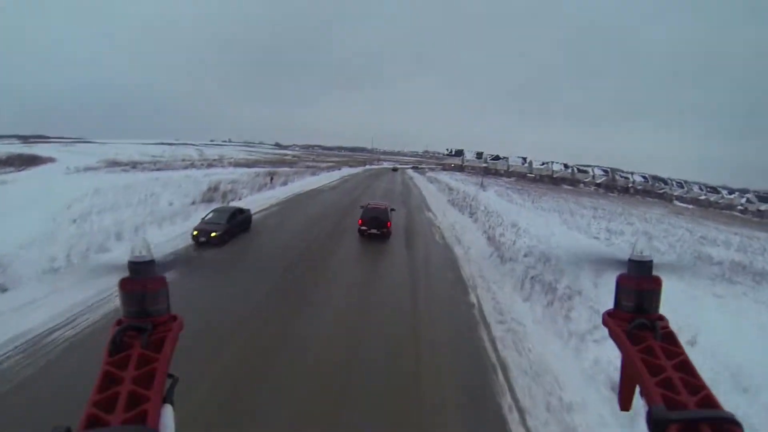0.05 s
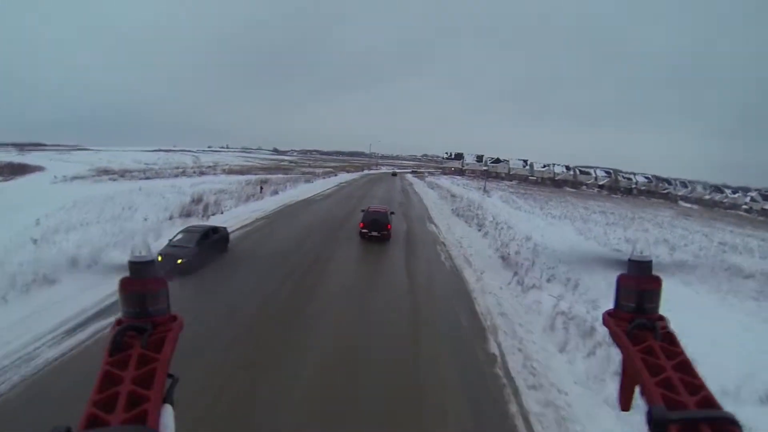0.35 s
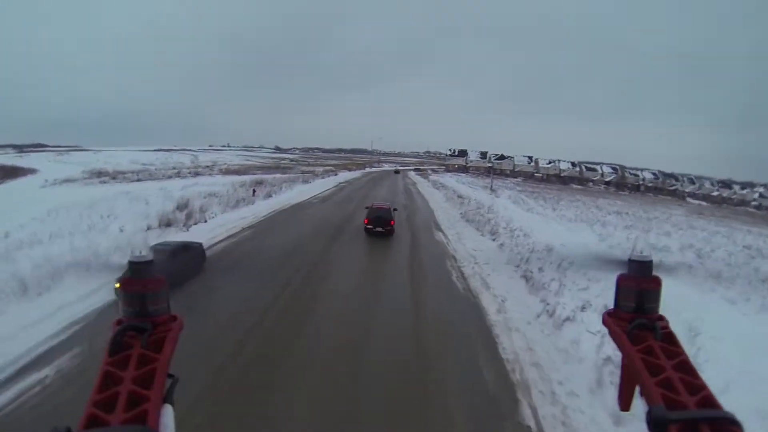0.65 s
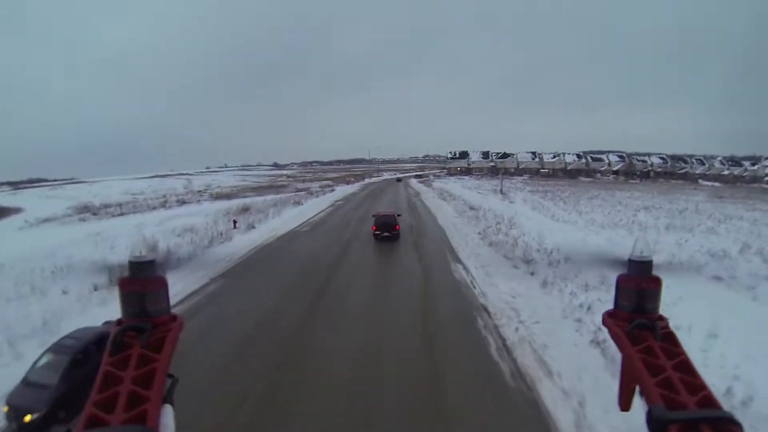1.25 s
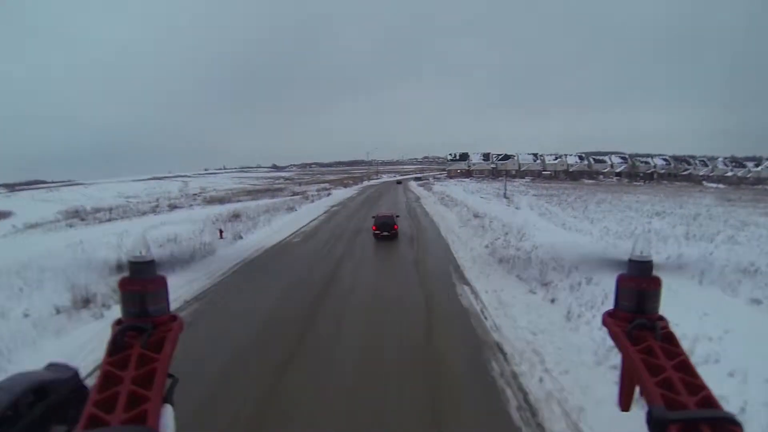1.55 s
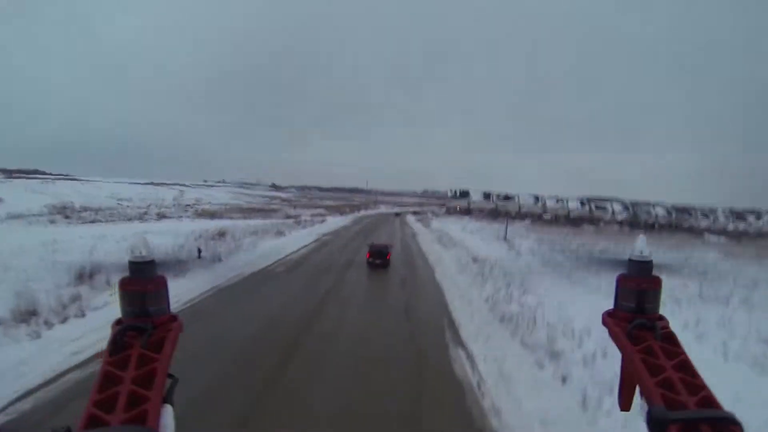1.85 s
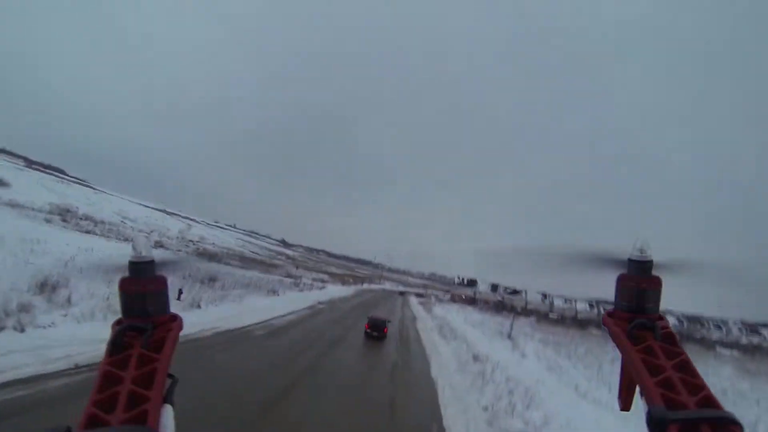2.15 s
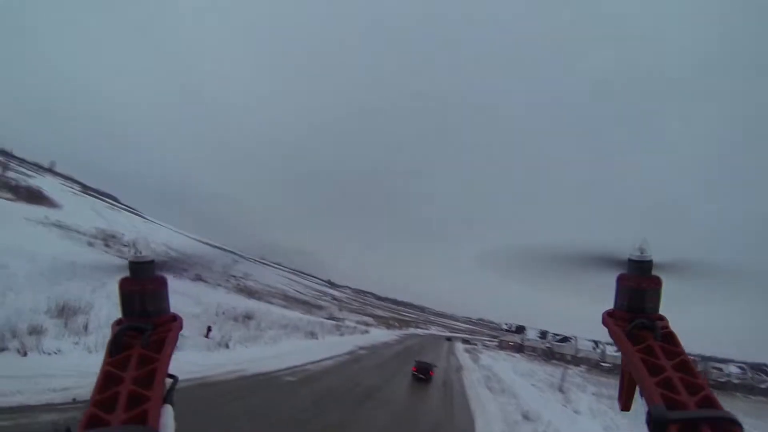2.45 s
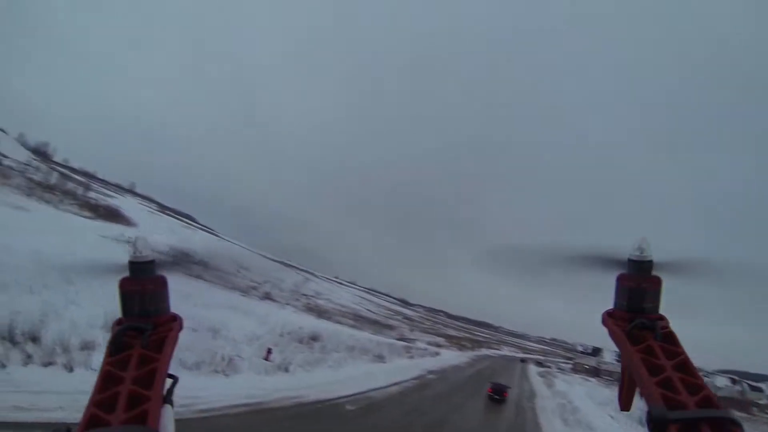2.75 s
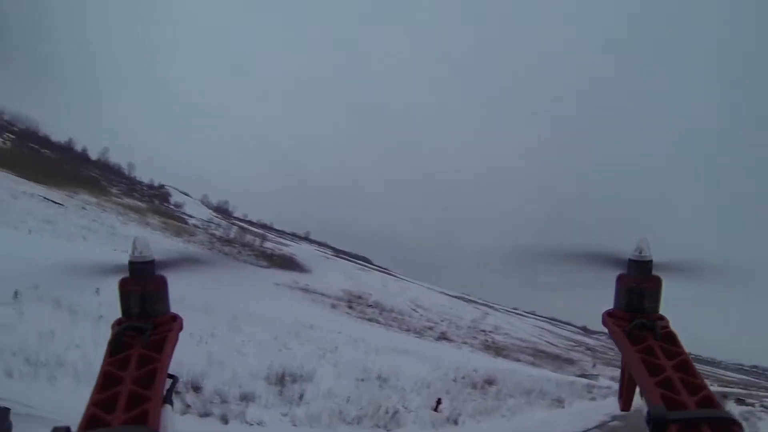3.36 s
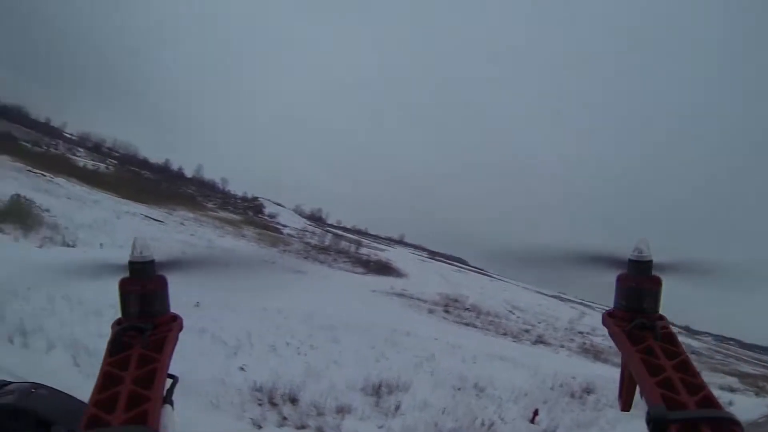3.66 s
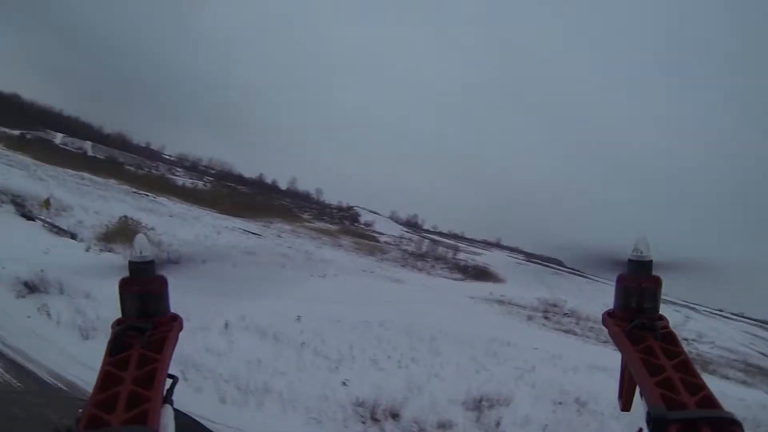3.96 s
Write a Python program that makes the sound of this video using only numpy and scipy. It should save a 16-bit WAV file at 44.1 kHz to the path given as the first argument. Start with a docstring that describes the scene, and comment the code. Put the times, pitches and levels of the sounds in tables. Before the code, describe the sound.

A drone's propellers buzz throughout, heard from its own frame in the open air. From the start, the rotors beat against each other with a choppy rasp, over hiss, a thin high whistle and light wind rumble. Around 2 seconds their pitches spread apart as it banks. From about 2.6 seconds the motor whine and buzz grow louder, and near 3.5 to 4 seconds the rasp and wind ease.

```python
"""A multirotor drone flies along a snowy road, heard from a camera on its own frame. From the start,
propellers at slightly different speeds beat against each other and chop gusty air into a rasp, the
speed controllers whistle near 8 kHz, and wind rumbles. About two seconds in, the rotor speeds spread
apart and the craft banks away; the whine and buzz of the motors then grow louder.
Late in the turn the air gets smoother."""
import sys
import numpy as np
from scipy import signal
from scipy.fft import rfft, irfft
from scipy.io import wavfile

SR = 44100
rng = np.random.default_rng(int(sys.argv[2]) if len(sys.argv) > 2 else 0)


def inscribe(sig):
    """Save sig as 16-bit PCM at rate SR to the path in sys.argv[1].

    A 1-D sig is mono; a 2-D sig holds one channel per row.
    Samples are clipped to [-1, 1] before scaling.
    """
    pcm = np.round(np.clip(np.atleast_2d(sig).T, -1, 1) * 32767)
    wavfile.write(sys.argv[1], SR, pcm.astype(np.int16))


N = 176400
T = np.arange(N) / SR
GUST_HZ = 25  # bandwidth of the random flutter
COG_ORDER, BUZZ_ORDER = 14, 42  # cycles per shaft turn

# Spectra of wind, hiss, turbulent wake and chopped air: frequency_hz, density_db
WIND_SPECTRUM = [(10,9.5),(35,2.5),(60,0.5),(85,-0.5),(120,-7),(150,-34.5),(300,-12),(800,-50)]
HISS_SPECTRUM = [(900,-41),(1500,2.5),(2500,0),(3400,-2),(4300,-1.5),(4700,-7),(5100,-16.5),(5800,-24),(6400,-19),(7300,-26),(7700,-15),(7870,-4.5),(8230,0.5),(8500,-8),(8900,-17),(9500,-17),(9900,-20.5),(11000,-24),(12000,-42)]
WAKE_SPECTRUM = [(100,-4),(200,0.5),(290,-10.5),(380,-7),(440,-5),(520,3),(620,-13),(690,-7),(800,3.5),(1000,3),(1300,-2.5),(2000,-24.5)]
RASP_SPECTRUM = [(500,-52),(900,-12.5),(1200,-3.5),(1450,3),(1680,4),(2050,-1),(2500,1.5),(2950,-7.5),(3400,0),(4300,-22.5),(5100,-24.5),(7000,-31.5),(12000,-37)]
# Envelopes of the same four noises: time_s, level_db
WIND_LEVEL = [(0,-34),(.14,-35),(.2,-25),(.28,-41),(1.4,-39),(1.8,-30),(2.05,-36),(2.3,-33),(2.6,-31),(2.82,-31),(3.1,-37),(3.4,-44),(4,-42)]
HISS_LEVEL = [(0,-23),(1.4,-25.5),(2.6,-22),(4,-24)]
WAKE_LEVEL = [(0,-29.5),(1.2,-30),(2.4,-30),(3,-37),(3.4,-37),(3.8,-44),(4,-42)]
RASP_LEVEL = [(0,-21),(.7,-20.5),(1.2,-22),(1.26,-28),(1.32,-19),(1.75,-19),(2.05,-25),(2.45,-20.5),(2.8,-21.5),(2.9,-27),(3.02,-20.5),(3.4,-23),(3.78,-26.5),(4,-27)]
# Switching tone of each speed controller: pitch_hz
SWITCH_HZ = [8011.76, 8031.11, 8042.05, 8065.04, 8094.52]
# Strength of each switching tone: level_db
SWITCH_DB = [-29, -37, -25, -43.5, -45]
# Envelopes of the switching tones, motor buzz, cogging whine and frame vibration: time_s, level_db
SWITCH_LEVEL = [(0,0),(1.5,0),(2.8,0.5),(3.4,1),(4,5)]
BUZZ_LEVEL = [(0,-43),(1.3,-45),(2.1,-40),(2.7,-34),(3.3,-31.5),(3.7,-34),(4,-38)]
WHINE_LEVEL = [(0,-43),(.6,-39),(1.5,-40),(2.1,-48),(2.45,-42),(2.68,-28),(3,-31),(3.3,-26),(3.55,-27.5),(3.82,-22.5),(4,-27)]
FRAME_LEVEL = [(0,-32),(.85,-29),(2.3,-33),(3,-25),(3.4,-23.5),(3.8,-20.5),(4,-22.5)]
# Resonances of the motor housings, frame, arms and blade slaps: frequency_hz, gain_db
HOUSING_RESPONSE = [(3600,-1),(3850,0),(4250,0),(4400,-9),(4700,4)]
FRAME_RESPONSE = [(700,-27),(950,-7.5),(1150,-26),(1400,0),(1610,7.5),(1720,0),(1900,-11.5),(2150,-5),(2400,0.5),(2740,-1),(2900,-15),(3500,-12),(4250,-8.5),(5000,-30)]
ARM_RESPONSE = [(300,-8),(345,-0.5),(385,-2),(430,1.5),(460,2),(495,6.5),(525,0.5),(565,-2),(650,-3),(1200,-0.5)]
SLAP_RESPONSE = [(400,-65),(1000,-22.5),(1350,-11),(1600,-0.5),(1800,2.5),(2100,-4),(2500,-7),(3000,-25),(4200,-20),(5200,-46),(9000,-60)]
# Envelopes of the blade slaps, blade-pass hum and its overtones: time_s, level_db
SLAP_LEVEL = [(0,-21.5),(.8,-23.5),(1.4,-22.5),(1.75,-21.5),(2.7,-23),(3.3,-27),(3.7,-27),(4,-48)]
HUM_LEVEL = [(0,-4),(.4,0.5),(1.5,-0.5),(2.6,1),(3.2,-1.5),(3.8,-0.5),(4,-8)]
OVERTONE_LEVEL = [(0,4.5),(.8,3),(1.3,-0.5),(1.8,2.5),(2.4,3.5),(3.05,5),(3.5,1),(4,-4)]
# Propeller overtones: blade_rate_multiple, level_db
OVERTONES = [(2, -44.5), (2.5, -58), (3, -45), (4, -52), (5, -48.5), (6, -53)]
# Speed of the nearest rotor: time_s, blade_pass_hz
NEAR_BLADE_RATE = [(0,182.9),(.2,180.6),(.48,181.3),(.62,187.7),(.74,184.2),(.86,186.8),(1.08,178.3),(1.22,177.3),(1.48,179.5),(1.66,173.1),(1.88,178.5),(2.1,173.1),(2.38,171.2),(2.5,180.4),(2.7,188.5),(3.27,183.1),(3.84,189.4),(4,187.1)]
# Speeds of the other rotors, one list each: time_s, blade_pass_hz
OTHER_BLADE_RATES = [
    [(0,203),(.3,200),(.65,204),(1.3,190),(1.78,186),(2.07,210),(2.37,218.5),(2.6,210),(2.9,208),(3.5,200),(4,194)],
    [(0,193),(.45,194),(1.2,185),(1.7,179),(2.3,199),(2.75,204),(3.03,201.5),(3.2,196),(4,192)],
    [(0,187),(.5,179),(.8,175),(1.6,166),(1.87,173),(2.1,185),(2.45,186),(2.75,193),(3.05,186),(3.3,182.5),(3.6,186.5),(4,189)],
    [(0,170),(.45,170),(.65,163),(.9,164),(1.15,158),(1.65,155),(1.9,174),(2.2,193),(2.5,197),(2.9,193),(3.3,186),(4,190)],
]
# Balance of the rotors, nearest first: blade_db, overtones_db, buzz_db
ROTOR_LEVELS = [(-29, -5, -3), (-38, -3, 0.5), (-37, -3.5, -2), (-35.5, -1.5, -4.5), (-50.5, -1.5, -7)]


def amp(db):
    """Amplitude ratio: tenfold for every 20 dB."""
    return 10 ** (np.asarray(db) / 20)


def unit(x):
    """Normalisation to rms 1."""
    return x / np.sqrt(np.mean(x ** 2) + 1e-20)


def curve(points):
    """Linear interpolation of (time_s, value) rows."""
    return np.interp(T, *np.transpose(points))


def response(points, hz):
    """Frequency response: gain interpolated in decibels over log frequency."""
    frequency_hz, gain_db = np.transpose(points)
    return amp(np.interp(np.log(hz + 1), np.log(frequency_hz), gain_db))


def shaped(x, points):
    """Filtering multiplies the spectrum by a response; the result has rms 1."""
    return unit(irfft(rfft(x) * response(points, np.fft.rfftfreq(N, 1 / SR)), N))


def drift(cutoff_hz):
    """Low-pass noise: smooth random motion of rms 1."""
    coarse_s = T[::32]
    hz = np.fft.rfftfreq(len(coarse_s), 32 / SR)
    spectrum = rfft(rng.standard_normal(len(coarse_s))) / (1 + (hz / cutoff_hz) ** 2) ** 2
    return np.interp(T, coarse_s, unit(irfft(spectrum, len(coarse_s))))


def flutter(depth_db):
    """Random amplitude modulation: a gain that wavers by depth_db rms."""
    return amp(depth_db * drift(GUST_HZ))


def tone(phase):
    """Simple harmonic motion of rms 1 with a random starting phase."""
    return np.sqrt(2) * np.sin(phase + rng.uniform(0, 2 * np.pi))


def shaft_angle(blade_rate, tremble=0.000997):
    """Angle is the integral of a slightly trembling speed; two blades pass per turn."""
    blade_hz = curve(blade_rate) * (1 + tremble * drift(11.1))
    return np.pi * np.cumsum(blade_hz) / SR + rng.uniform(0, 2 * np.pi)


def wind():
    """Turbulent pressure buffets the microphone with a low rumble."""
    return amp(curve(WIND_LEVEL) - 3) * flutter(1) * shaped(rng.standard_normal(N), WIND_SPECTRUM)


def hiss():
    """Broadband noise from blade tips and motors makes a fine, steady hiss."""
    return amp(curve(HISS_LEVEL)) * flutter(1.34) * shaped(rng.standard_normal(N), HISS_SPECTRUM)


def controllers(angles, ripple=0.12, sway_rad=0.043):
    """Beating: nearly equal switching tones interfere, each modulated by its rotor's uneven load."""
    whistle = 0
    for hz, db, angle in zip(SWITCH_HZ, SWITCH_DB, angles):
        blade_phase = 2 * angle + drift(45)
        load = 1 + ripple * np.cos(blade_phase)
        whistle += amp(db) * load * tone(2 * np.pi * hz * T + sway_rad * np.sin(blade_phase))
    return amp(curve(SWITCH_LEVEL)) * whistle


def motor_buzz(angle, buzz_db):
    """Magnets passing the coils excite the housing, whose resonance colours the buzz."""
    buzz_hz = BUZZ_ORDER * np.gradient(angle) * SR / (2 * np.pi)
    level = amp(curve(BUZZ_LEVEL) + buzz_db) * flutter(1.5)
    return response(HOUSING_RESPONSE, buzz_hz) * level * tone(BUZZ_ORDER * angle)


def near_motor(angle):
    """Forced vibration: the nearest motor shakes the frame at shaft harmonics; cogging adds a whine."""
    mean_shaft_hz = np.mean(curve(NEAR_BLADE_RATE)) / 2
    frame = sum(response(FRAME_RESPONSE, k * mean_shaft_hz) * flutter(2) * tone(k * angle)
                for k in range(8, 54) if k != COG_ORDER)
    whine = amp(curve(WHINE_LEVEL)) * flutter(2) * tone(COG_ORDER * angle)
    return amp(curve(FRAME_LEVEL)) * unit(frame) + whine


def blade_slaps(angles, unevenness=0.46, jitter_s=0.0002, burst_db=2.8):
    """Blade-vortex interaction: each pass gives one uneven knock, and the knocks swell in bursts."""
    knocks = np.zeros(N)
    for angle, (blade_db, _, _) in zip(angles, ROTOR_LEVELS):
        passes = np.flatnonzero(np.diff(angle // np.pi))
        strength, lateness = rng.standard_normal((2, N))[:, :len(passes)]
        onsets = np.clip(passes + np.round(lateness * jitter_s * SR).astype(int), 0, N - 1)
        knocks[onsets] += amp(blade_db) * np.exp(unevenness * np.minimum(strength, 1))
    burst_hz = 15 * (1 + 0.482 * drift(GUST_HZ))
    bursts = amp(burst_db * tone(2 * np.pi * np.cumsum(burst_hz) / SR))
    return amp(curve(SLAP_LEVEL)) * shaped(knocks * bursts, SLAP_RESPONSE)


def chopped_air(angles, chop_depth=0.67, spread_db=5, gust_db=2):
    """Modulated turbulence: each blade pass throws a puff of noise, and gusts make the puffs uneven."""
    puffs = sum(amp(blade_db + spread_db * drift(190)) * np.exp(chop_depth * np.cos(2 * angle))
                for angle, (blade_db, _, _) in zip(angles, ROTOR_LEVELS))
    drive = puffs * amp(gust_db * np.minimum(drift(GUST_HZ), 1))
    rasp = amp(curve(RASP_LEVEL)) * shaped(drive * rng.standard_normal(N), RASP_SPECTRUM)
    wake = amp(curve(WAKE_LEVEL)) * shaped(np.sqrt(drive) * rng.standard_normal(N), WAKE_SPECTRUM)
    return rasp + wake


def propeller(angle, blade_db, overtones_db):
    """Periodic blade passes radiate a hum whose overtones glide through the resonances of the arms."""
    blade_phase = 2 * angle
    blade_hz = np.gradient(angle) * SR / np.pi
    hum = amp(curve(HUM_LEVEL) + blade_db) * flutter(1.03) * tone(blade_phase)
    overtones = sum(response(ARM_RESPONSE, k * blade_hz) * amp(db) * flutter(2.5) * tone(k * blade_phase)
                    for k, db in OVERTONES)
    return hum + amp(curve(OVERTONE_LEVEL) + overtones_db) * overtones


def scene():
    """Superposition: rotors, electronics and moving air add in one channel."""
    angles = [shaft_angle(rate) for rate in [NEAR_BLADE_RATE] + OTHER_BLADE_RATES]
    rotors = sum(propeller(angle, blade_db, overtones_db) + motor_buzz(angle, buzz_db)
                 for angle, (blade_db, overtones_db, buzz_db) in zip(angles, ROTOR_LEVELS))
    machinery = rotors + near_motor(angles[0]) + controllers(angles)
    air = chopped_air(angles) + blade_slaps(angles) + hiss() + wind()
    return (machinery + air)[None]


def record(dry, ceiling=0.9, cutoff_hz=12064):
    """Soft saturation in the camera rounds the highest peaks; a low-pass filter limits the band."""
    rounded = dry / (1 + (dry / ceiling) ** 8) ** (1 / 8)
    low_pass = signal.firwin(2047, cutoff_hz, window=("kaiser", 9), fs=SR)
    return signal.oaconvolve(rounded, low_pass[None], "same")


dry = scene()
out = record(dry)
inscribe(out)
```